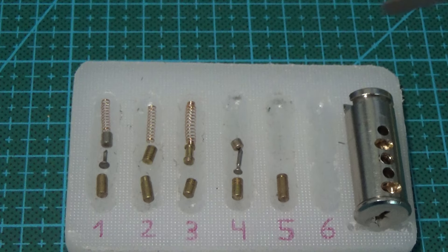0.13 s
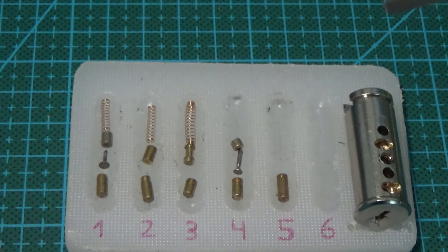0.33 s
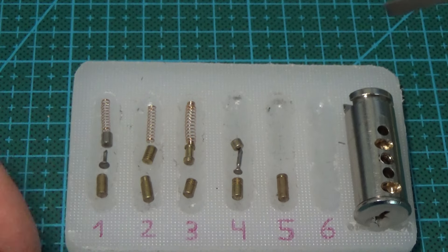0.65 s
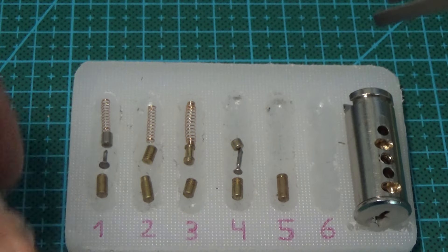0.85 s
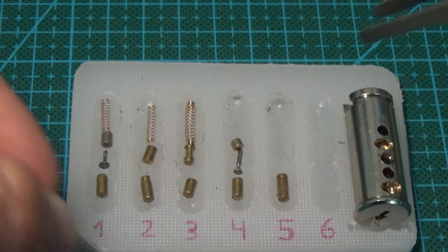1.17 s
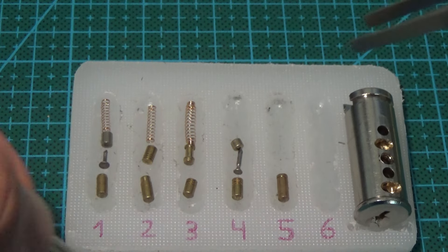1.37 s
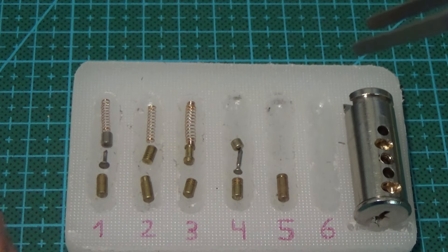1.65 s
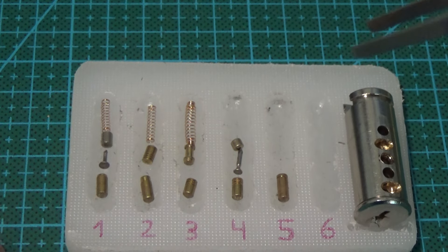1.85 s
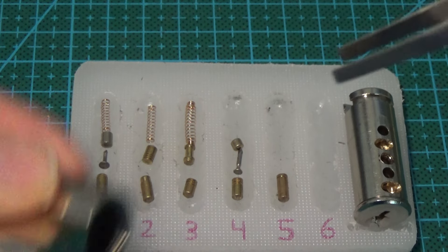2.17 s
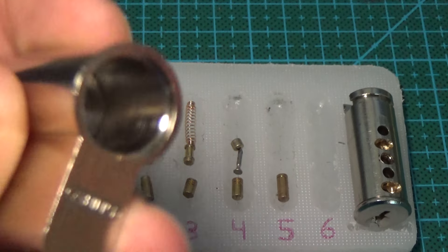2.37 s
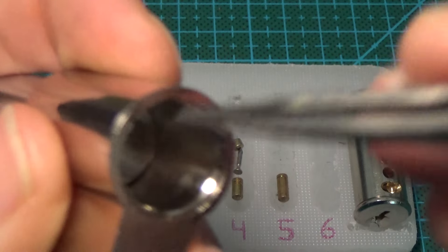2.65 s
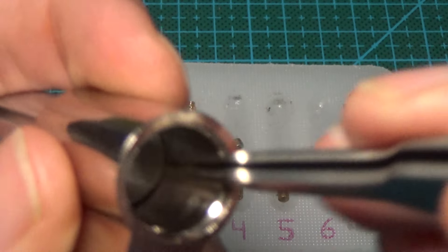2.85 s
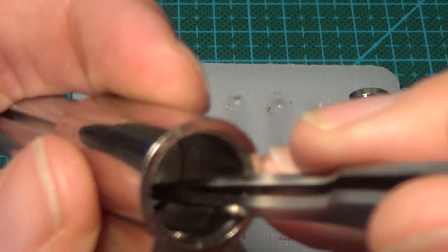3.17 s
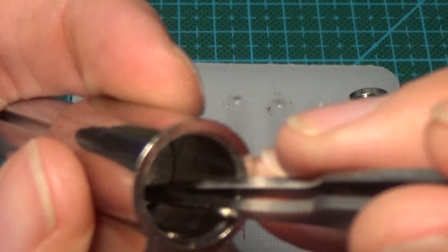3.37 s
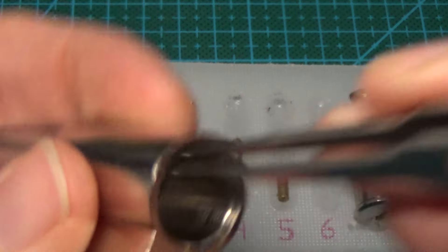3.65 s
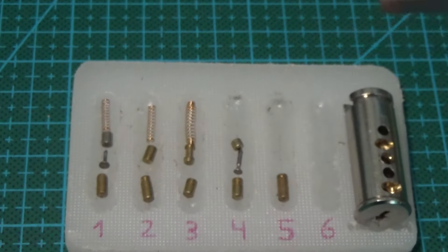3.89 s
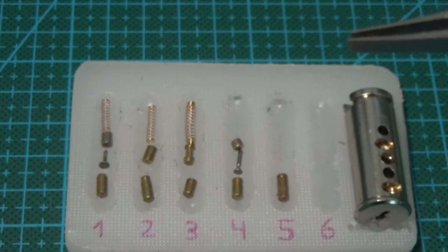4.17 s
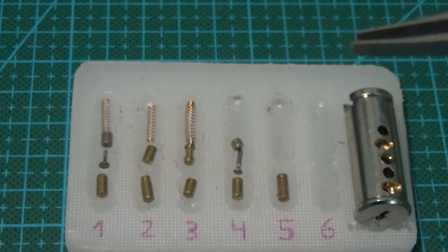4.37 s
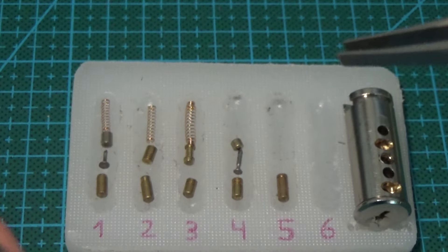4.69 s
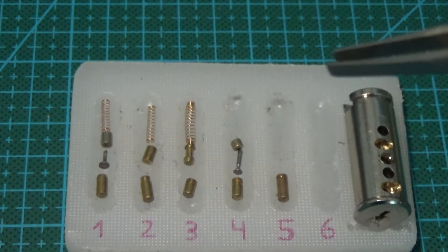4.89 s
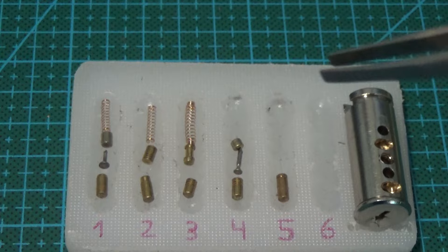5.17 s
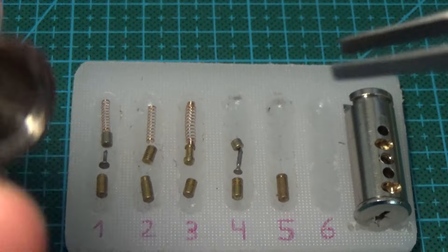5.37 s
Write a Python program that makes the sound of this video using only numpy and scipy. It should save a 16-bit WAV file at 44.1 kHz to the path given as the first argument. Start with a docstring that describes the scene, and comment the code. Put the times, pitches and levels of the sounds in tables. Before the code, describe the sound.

Right at the start, a metal lock housing is knocked once on a workbench mat: a thud and clack with a short, low ring from the bench and a clink of loose brass pins. Fingers slide faintly over metal, with a small bump near 0.9 seconds. Three quick knocks come between 1.6 and 2 seconds, the middle one strongest, each making the pins clink. Tweezers snap lightly shut at 2.4 seconds amid soft handling bumps, tick against the housing at 2.8 and scrape very faintly inside it around 3. After a pause, three harder knocks land at about 4.1, 4.5 and 4.8 seconds, growing louder. The last makes the pins jump and rattle brightly to rest, with one tiny final tick near 5.3. Everything sounds close, in a small quiet room with steady low hiss and faint, rapid, regular electrical ticking.

```python
"""A lock housing is knocked on a workbench mat to shake a part loose: one blow at 0.1 s, three at 1.6-2 s.
Each thuds, clacks and rings the bench; loose brass pins clink after it. Fingers slide on the metal between.
At 2.4-3.1 s tweezers snap shut, tick on the housing and scrape its bore.
Three harder knocks follow at 4.1-4.8 s; the pins rattle to rest after the last.
Throughout: a small quiet room, hiss and faint regular electrical ticking."""
import sys
import numpy as np
from scipy import signal
from scipy.fft import rfft, irfft, next_fast_len
from scipy.io import wavfile
from scipy.ndimage import uniform_filter1d

SR = 44100
rng = np.random.default_rng(int(sys.argv[2]) if len(sys.argv) > 2 else 0)


def to_wav(sig):
    """Store sig (one row per channel, or 1-D mono) as 16-bit WAV at the path in sys.argv[1].

    Samples outside -1..1 are clipped; the rate is SR.
    """
    pcm = np.clip(np.atleast_2d(sig), -1, 1) * 32767
    pcm = np.round(pcm).astype(np.int16)
    wavfile.write(sys.argv[1], SR, pcm.T)  # frames by channels


N = 244088
TIME_S = np.arange(N) / SR
RING = SR // 2  # samples per impact
AGE_S = TIME_S[:RING]
HZ = np.fft.rfftfreq(RING, 1 / SR)

# blows and the pin each throws: (time [s], strength [dB], spot liveliness [dB], edge lead [s; 0 = flat],
# rebound [dB], pin flight [s], pin level [dB], pin pitch [Hz], pin spread [octaves])
KNOCKS = [(0.0910, -8, -1.5, 0.00254, -40.5, .0042, -29, 5600, 0.154),
          (1.5876, -22.5, 0, 0, -45, .0031, -18.5, 5000, 0.71),
          (1.8159, -8.5, -.5, 0.00398, -47.5, .0044, -21, 5620, 0.364),
          (1.9522, -22, 1, 0, -42, .0007, -28, 3950, 0.583),
          (4.1480, -7.5, -1, 0.00225, -21.5, .004, -43, 5000, .4),
          (4.474, -5, 0.5, 0, -21.5, .0065, -20, 4720, 0.33),
          (4.8169, -3.5, 2, 0, -9.5, .0068, -11, 5400, .5)]
# mat thud: (frequency [Hz], level [dB])
THUD_SPECTRUM = [(25, -27), (70, 2), (250, 8), (700, 4.5), (2200, -0.5), (2500, -15.5), (2900, 0),
                 (3500, -11), (4500, -21), (6300, -16.5), (7500, -21.5), (10000, -24.5), (16000, -51)]
# housing on the mat: (frequency [Hz], width [Hz], level [dB])
CLACK_MODES = [(1232.1, 250, 2), (1670, 290, -2), (2074, 110, -5), (2800, 890, -14)]
# bench top: (frequency [Hz], level [dB], t60 [s], rise [s])
BENCH_MODES = [(63.7, -39.5, 0.54, 0.0043), (115, -6, 0.1769, 0.055), (139.8, -32.5, 0.28, 0.0069),
               (191.32, -19, 0.11, 0.0037), (218.12, -31, 0.23, 0.0014), (232.47, -22.5, 0.1476, 0.0027),
               (285.7, -23.5, 0.18, 0.0011), (304.08, -16.5, 0.1162, 0.0039), (337.8, -41.5, 0.36, 0.0053),
               (531.6, -26, 0.09, 0.00053), (611.9, -36.5, 0.17, .001), (723, -19.5, 0.032, 0.00071),
               (1197, -23.5, 0.059, 0.00092), (1360, -39, 0.23, 0.00082)]
# dense ring of the bench and things on it: (frequency [Hz], level [dB])
CLUTTER_SPECTRUM = [(50, -19.5), (150, -4), (290, -3), (400, -6), (550, -6.5), (950, -9), (1300, -14),
                    (2100, -8), (2500, -9), (3200, -15.5), (5000, -21), (8000, -34.5), (11000, -34.5),
                    (16000, -54)]
# decay of that ring: (frequency [Hz], t60 [s])
CLUTTER_DECAY = [(100, .2), (500, 0.18), (2000, 0.049), (10000, 0.068)]
# pins and cylinder: (frequency [Hz], width [Hz], level [dB])
BRASS_MODES = [(3650, 870, -4.5), (5143, 350, -7), (5880, 400, -5.5), (6364, 160, 1), (8860, 200, -11),
               (9380, 510, 1.5), (9694, 240, -2), (10660, 320, -1.5), (11500, 180, -11.5),
               (12800, 690, -13), (14780, 400, -12.5)]
# pins settling on their own: (time [s], level [dB], pitch [Hz], spread [octaves])
PIN_SETTLES = [(0.127, -42.5, 4470, 0.28), (4.8775, -27.5, 4200, 0.69), (5.275, -44.5, 10000, 0.965)]
# tweezer tips snapping shut: (frequency [Hz], width [Hz], level [dB])
TWEEZER_MODES = [(2073, 100, -5), (3470, 170, -2), (4500, 360, -7.5), (4900, 340, 2), (7600, 256, 2),
                 (10000, 500, 3.5), (13000, 790, -1), (15300, 1130, 2)]
# hollow housing touched by the tips: (frequency [Hz], width [Hz], level [dB])
HOUSING_MODES = [(2840, 320, 0), (3700, 194, -7.5), (5340, 180, -10), (6150, 168, 0), (7150, 255, -10.5),
                 (7720, 220, -3), (9015, 310, -3), (10000, 510, 4), (10860, 280, 0), (13150, 370, -6),
                 (14360, 330, -17)]
# tweezer strokes in the bore: (time of peak pressure [s], level [dB])
BORE_STROKES = [(2.957, -57), (3.053, -65.5)]
# fingertips sliding on metal: (time [s], level [dB], half length [s])
FINGER_RUBS = [(0.528, -63.5, 0.0474), (0.777, -66, 0.0336), (0.892, -63.5, 0.0184), (1.182, -66.5, 0.058),
               (1.452, -69, 0.054), (2.018, -59.5, 0.0096), (2.222, -68.5, 0.0675), (2.526, -70, 0.18),
               (3.82, -74.5, 0.122), (5.355, -69.5, 0.0983)]
# skin friction: (frequency [Hz], level [dB])
SKIN_SPECTRUM = [(1500, -17), (4000, -6.5), (7000, -2.5), (9500, 0), (12000, -11.5), (16000, -19.5)]
# soft hand bumps: (time [s], level [dB], pitch [Hz], length [s], spread [octaves])
HAND_BUMPS = [(.9008, -43.5, 1001, 0.0069, 0.42), (2.408, -63.5, 269, 0.16, 0.48),
              (2.463, -61, 115, 0.112, 0.417), (2.803, -55.5, 115, 0.0895, 0.69)]
# reverberation colour: (frequency [Hz], level [dB])
ROOM_SPECTRUM = [(40, -4.5), (130, -8), (230, -1), (305, -4.5), (400, 2.5), (700, -6), (1400, 3.5),
                 (4000, -2.5), (6000, -2), (14000, 2.5)]
# reverberation decay: (frequency [Hz], t60 [s])
ROOM_DECAY = [(100, 0.93), (300, 0.882), (700, 0.66), (1500, 0.2775), (5000, 0.41), (12000, 0.25)]
# electrical pip partials: (frequency [Hz], level [dB])
PIP_PARTIALS = [(2850, -60.5), (3450, -62.5)]
# pip strength: (time [s], gain [dB])
PIP_SWELL = [(0, 0), (2.9, -2.5), (3.4, 2.5), (4.2, 2), (5.5, 1)]
# air and microphone noise: (frequency [Hz], level [dB])
HISS_SPECTRUM = [(18, -33.5), (30, -4), (52, -5.5), (71, -7), (266, -5.5), (384, -7), (554, -9),
                 (760, -9.5), (1250, -10), (1810, -13.5), (2410, -13), (2750, -14), (4420, -18),
                 (14800, -24.5), (16000, -32)]
# left-right likeness of the hiss: (frequency [Hz], correlation [0-1])
HISS_CORRELATION = [(60, 1), (240, 0.62), (950, 0.018), (3770, 0.42), (15000, 1)]
# stereo width from nearby reflections: (frequency [Hz], side re mid [dB])
STEREO_WIDTH = [(100, -56.5), (250, -34.5), (500, -9.5), (1100, -15.5), (2200, -13), (5000, -9),
                (13000, -15)]
# channel balance: (frequency [Hz], left minus right [dB])
STEREO_BALANCE = [(150, -1), (280, -0.5), (550, 0.48), (2000, 0.92), (4500, 0), (9000, 1.18), (13000, 0.5)]

THUD_DB, THUD_SLOPE = -9.5, 0.5956  # slope: dB per dB of strength
CLACK_DB, CLACK_SLOPE = -1.5, 1.278  # steeper, so hard knocks are sharper
REBOUND_S, REBOUND_HZ = 0.0559, 3620
TOUCH_DB, TOUCH_HZ, TOUCH_OCTAVES = -23.5, 8740, 0.4  # tick at first touch; level re the knock
STROKE_RISE_S, STROKE_FALL_S = 0.028, 0.0123


def knocks(spring_hz=1700, mat_hz=3000, clutter_db=5, clutter_rise_s=0.00033, edge_db=-1.5):
    """Each blow pushes the mat, clacks the housing and rings the bench; a duller rebound follows."""
    recoil = (spring_hz - 1j * HZ) / (spring_hz + 1j * HZ)  # surface gives way, springs back
    thud = peaked(irfft(-causal(along(THUD_SPECTRUM, HZ)) * recoil))
    clack = peaked(irfft(-resonances(CLACK_MODES, HZ) * recoil * lowpass(mat_hz, order=2)))
    modes = np.array([-decay(t60_s, db) * onset(rise_s) ** 2 * np.cos(2 * np.pi * hz * AGE_S)
                      for hz, db, t60_s, rise_s in BENCH_MODES])

    def clutter():
        return amp(clutter_db) * tail(CLUTTER_SPECTRUM, CLUTTER_DECAY) * onset(clutter_rise_s)

    def blow(db, push, lively_db):
        snap = amp(CLACK_DB + CLACK_SLOPE * db)
        boom = amp(rng.standard_normal(len(modes))) @ modes  # each spot favours other modes
        bench = amp(db) * boom + np.hypot(push, snap) * clutter()
        return push * thud + snap * clack + amp(lively_db) * bench

    track = np.zeros(N)
    for s, db, lively_db, lead_s, rebound_db, *_ in KNOCKS:
        push = amp(THUD_DB + THUD_SLOPE * db)
        add(track, s, blow(db, push, lively_db))
        rebound = irfft(rfft(blow(db, push, lively_db)) * lowpass(REBOUND_HZ, order=2))
        add(track, s + REBOUND_S, amp(rebound_db) * rebound)
        if lead_s > 0:  # an edge lands first
            add(track, s - lead_s, amp(edge_db) * push * (thud + clutter()))
    return track


def pin_strikes(count=3, bounce_s=0.0045, loss_db=12):
    """Settling, first touches and bounces: (time [s], level [dB], pitch [Hz], spread [octaves])."""
    strikes = list(PIN_SETTLES)
    for s, db, _, lead_s, _, flight_s, pin_db, pin_hz, octaves in KNOCKS:
        strikes.append((s - lead_s, db + TOUCH_DB, TOUCH_HZ, TOUCH_OCTAVES))
        for k in range(count):
            strikes.append((s + flight_s + k * bounce_s, pin_db - k * loss_db, pin_hz, octaves))
    return strikes


def pin_clinks(ring_db=3, contact_hz=12500):
    """Each pin contact rings the brass; how it lands sets pitch and spread."""
    track = np.zeros(N)
    body = (1 + amp(ring_db) * resonances(BRASS_MODES, HZ)) * lowpass(contact_hz, order=6)
    for s, db, strike_hz, octaves in pin_strikes():
        strike = rfft(chatter(t60_s=0.018, spray_gain=1.326)) * causal(hump_db(HZ, strike_hz, octaves))
        add(track, s, amp(db) * peaked(irfft(strike * body)))
    return track


def pin_rattle(flight_s=0.0075, contacts_per_s=9000, contact_hz=12500):
    """After the hardest knock the brass parts jump, crash down together and chatter to rest."""
    track = np.zeros(N)
    knock_s = max(KNOCKS, key=lambda knock: knock[1])[0]
    contacts = (rng.random(RING) < contacts_per_s / SR) * rng.standard_normal(RING)
    ring = unit(irfft(rfft(contacts) * resonances(BRASS_MODES, HZ) * lowpass(contact_hz, order=8)))
    crash = decay(t60_s=0.0154, db=-18)
    settle = decay(t60_s=0.221, db=-29)
    add(track, knock_s + flight_s, (crash + settle) * ring)
    return track


def tweezers(drag_hz=4300, rasp_db=-17, damping_ratio=0.57, bore_hz=2820, bore_width_hz=110, bore_db=3):
    """Steel tips snap shut, touch the housing, then scrape the bore, whose air rings."""
    track = np.zeros(N)
    add(track, 2.3697, steel_tick(TWEEZER_MODES, db=-28.5))
    add(track, 2.8335, steel_tick(HOUSING_MODES, db=-23.5))
    # a light touch damps the housing less
    modes = [(hz, width_hz * damping_ratio, db) for hz, width_hz, db in HOUSING_MODES]
    modes.append((bore_hz, bore_width_hz, bore_db))
    colour = lambda hz: (resonances(modes, hz) + amp(rasp_db)) * amp(hump_db(hz, drag_hz, octaves=0.68))
    scrape = unit(grit(depth_db=2.5, samples=90) * noise(colour))
    pressure = sum(amp(db) * swell(s, STROKE_RISE_S, STROKE_FALL_S) for s, db in BORE_STROKES)
    return track + pressure * scrape


def steel_tick(modes, db, crack_db=-12):
    """Light dry touch: a crack and a very short ring."""
    body = amp(crack_db + hump_db(HZ, 6100, octaves=1.57)) + resonances(modes, HZ)
    contact = rfft(chatter(t60_s=0.0183, spray_gain=1.57))
    return amp(db) * peaked(irfft(contact * body))


def hands():
    """Skin hisses over metal; grip shifts give soft bumps."""
    pressure = sum(amp(db) * swell(s, half_s, half_s) for s, db, half_s in FINGER_RUBS)
    friction = grit(depth_db=1.5, samples=130) * noise(lambda hz: amp(along(SKIN_SPECTRUM, hz)))
    track = pressure * unit(friction)
    for s, db, bump_hz, length_s, octaves in HAND_BUMPS:
        progress = AGE_S / (length_s / 4)  # 1 at the peak
        bump = noise(lambda hz: amp(hump_db(hz, bump_hz, octaves)), samples=RING)
        add(track, s, amp(db) * progress * np.exp(1 - progress) * bump)
    return track


def nearby_reflections(x, t60_s=0.0065):
    """Echoes off close objects: the side signal that sets the channels slightly apart."""
    echoes = rng.standard_normal(RING) * AGE_S * decay(t60_s)
    side = signal.fftconvolve(x, echoes / np.linalg.norm(echoes))[:N]
    return filtered(side, lambda hz: amp(along(STEREO_WIDTH, hz)))


def room(x, wet_db=-17, side_db=-11, delay_s=0.0046):
    """Soft wall reverberation, nearly alike in both channels."""
    late = np.pad(x, (round(delay_s * SR), 0))
    mid, side = [signal.fftconvolve(late, tail(ROOM_SPECTRUM, ROOM_DECAY))[:N] for _ in range(2)]
    return amp(wet_db) * np.array([mid + amp(side_db) * side, mid - amp(side_db) * side])


def electrical_pips(period_s=0.04, first_s=0.002, sigma_s=0.0011, weak_db=-8, scatter_db=1.5):
    """Faint regular interference pips, every other one weaker."""
    pip = np.round(TIME_S / period_s).astype(int)
    count = pip[-1] + 1
    offset_s = TIME_S - pip * period_s - first_s
    gains = amp(scatter_db * rng.standard_normal((count, len(PIP_PARTIALS))))[pip].T
    tone = np.zeros(N)
    for (hz, db), gain in zip(PIP_PARTIALS, gains):
        phase = rng.uniform(0, 2 * np.pi, count)[pip]
        tone += amp(db) * gain * np.cos(2 * np.pi * hz * offset_s + phase)
    level_db = np.interp(TIME_S, *np.transpose(PIP_SWELL)) + weak_db * (pip % 2 == 0)
    return amp(level_db) * np.exp(-0.5 * (offset_s / sigma_s) ** 2) * tone


def hiss(db=-63):
    """Steady room air and microphone noise."""
    def colour(hz):
        angle = np.arccos(np.clip(along(HISS_CORRELATION, hz), 0, 1)) / 2
        return amp(along(HISS_SPECTRUM, hz)) * np.array([np.cos(angle), np.sin(angle)])

    mid, side = filtered(rng.standard_normal((2, N)), colour)
    return amp(db) * unit(np.array([mid + side, mid - side]))


def chatter(t60_s, spray_gain):
    """One contact, then a dying spray of micro-contacts."""
    spray = rng.standard_normal(RING) * decay(t60_s)
    return signal.unit_impulse(RING) + spray_gain * spray / np.linalg.norm(spray)


def grit(depth_db, samples):
    """Random gain swings of friction, each about `samples` long."""
    return amp(depth_db * unit(uniform_filter1d(rng.standard_normal(N), size=samples)))


def tail(spectrum, t60_points):
    """Diffuse ring of energy 1; each frequency decays at its own rate."""
    hz, age_s, bins = signal.stft(rng.standard_normal(RING), SR, nperseg=256)
    fade = amp(-60 * age_s / along(t60_points, hz)[:, None])
    ring = signal.istft(bins * fade, SR, nperseg=256)[1][:RING]
    ring = irfft(rfft(ring) * causal(along(spectrum, HZ)))
    return ring / np.linalg.norm(ring)


def noise(response, samples=N):
    """Coloured noise, rms 1."""
    return unit(filtered(rng.standard_normal(samples), response))


def decay(t60_s, db=0):
    """Exponential fall from a starting level."""
    return amp(db - 60 * AGE_S / t60_s)


def onset(rise_s):
    """Exponential approach to 1."""
    return 1 - np.exp(-AGE_S / rise_s)


def swell(s, rise_s, fall_s):
    """Gaussian rise to 1 at time s, then a Gaussian fall."""
    return np.exp(-0.5 * ((TIME_S - s) / np.where(TIME_S < s, rise_s, fall_s)) ** 2)


def resonances(modes, hz):
    """Complex response of modes: (frequency [Hz], width [Hz], level [dB])."""
    return sum(amp(db) * 1j * hz * width_hz / (mode_hz ** 2 - hz ** 2 + 1j * hz * width_hz)
               for mode_hz, width_hz, db in modes)


def hump_db(hz, centre_hz, octaves):
    """Rounded band about a centre."""
    return -20 * np.log10(1 + (np.log2((hz + 1) / centre_hz) / octaves) ** 2)


def lowpass(edge_hz, order):
    """Treble loss from finite contact time, on the HZ grid."""
    return causal(-10 * np.log10(1 + (HZ / edge_hz) ** (2 * order)))


def causal(db):
    """Minimum-phase response with these levels on the HZ grid."""
    cepstrum = irfft(np.log(amp(db) + 1e-6))
    cepstrum[1:RING // 2] *= 2
    cepstrum[RING // 2 + 1:] = 0
    return np.exp(rfft(cepstrum))


def filtered(x, response):
    """x through a frequency response."""
    samples = x.shape[-1]
    padded = next_fast_len(samples + SR // 4)
    return irfft(rfft(x, padded) * response(np.fft.rfftfreq(padded, 1 / SR)), padded)[..., :samples]


def along(points, hz):
    """Interpolate (frequency [Hz], value) points on a log axis."""
    point_hz, values = np.transpose(points)
    return np.interp(np.log(hz + 1), np.log(point_hz + 1), values)


def add(track, s, sound):
    """Mix a sound in at time s."""
    start = round(s * SR)
    track[..., start:start + sound.shape[-1]] += sound[..., :N - start]


def amp(db):
    """dB to gain."""
    return 10 ** (np.asarray(db) / 20)


def unit(x):
    """x at rms 1."""
    return x / np.sqrt(np.mean(x ** 2) + 1e-20)


def peaked(x):
    """x at peak 1."""
    return x / np.abs(x).max()


def scene():
    """Bench work and its reflections in stereo, over hiss and pips."""
    work = knocks() + pin_clinks() + pin_rattle() + tweezers() + hands()
    sign = np.array([[1], [-1]])  # left, right
    pair = work + sign * nearby_reflections(work) + room(work)
    balanced = filtered(pair, lambda hz: amp(sign * along(STEREO_BALANCE, hz) / 2))
    return balanced + hiss() + electrical_pips()


def record(dry):
    """Steep band limit at 16 kHz."""
    return filtered(dry, lambda hz: 1 / np.sqrt(1 + (hz / 16000) ** 120))


dry = scene()
out = record(dry)
to_wav(out)
```